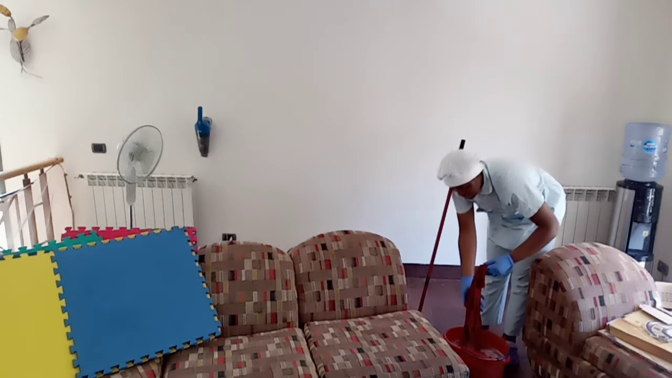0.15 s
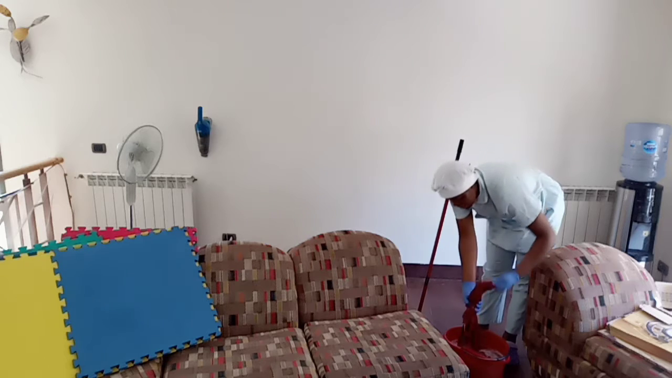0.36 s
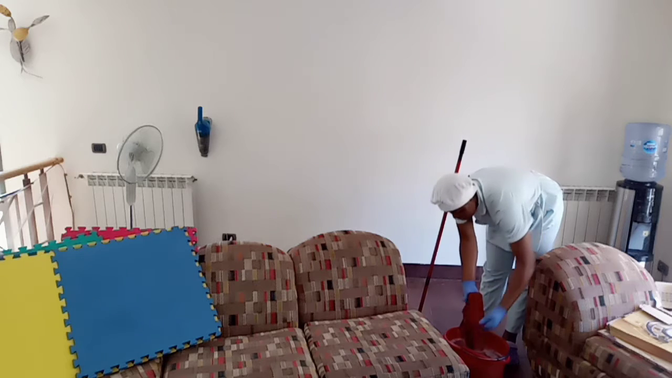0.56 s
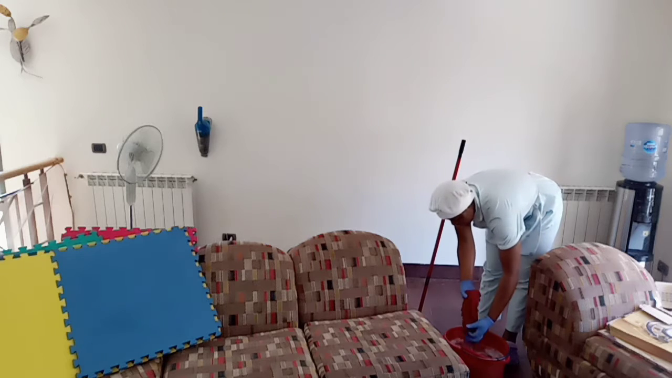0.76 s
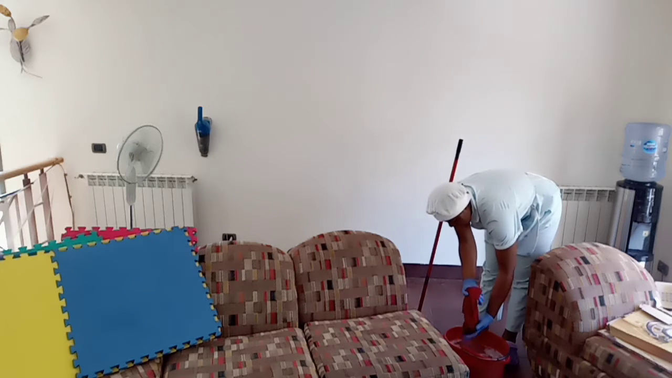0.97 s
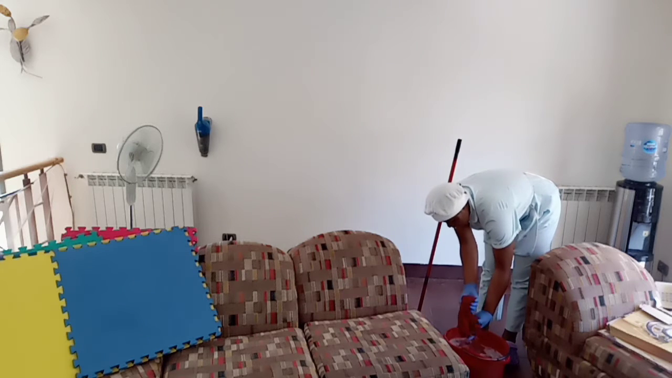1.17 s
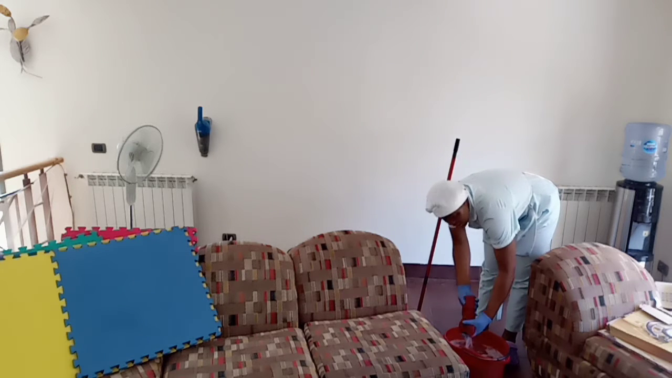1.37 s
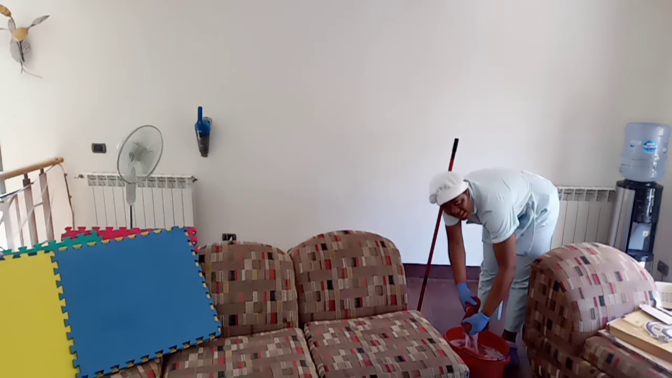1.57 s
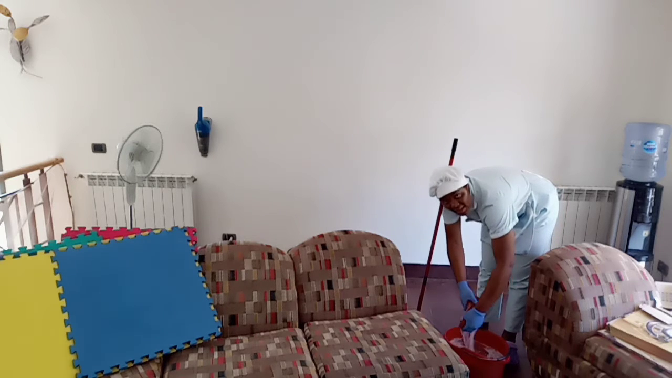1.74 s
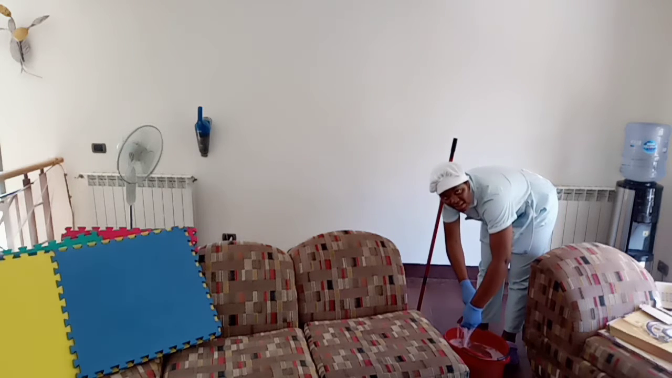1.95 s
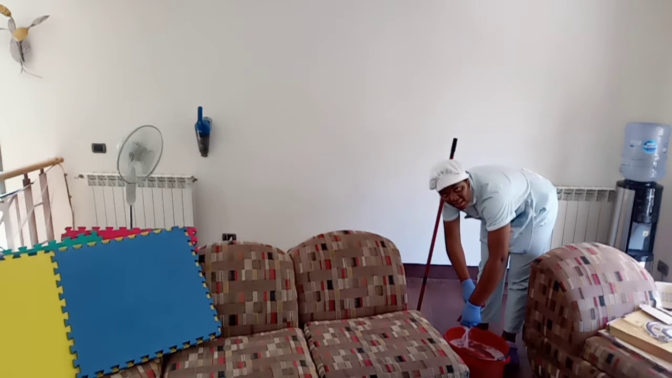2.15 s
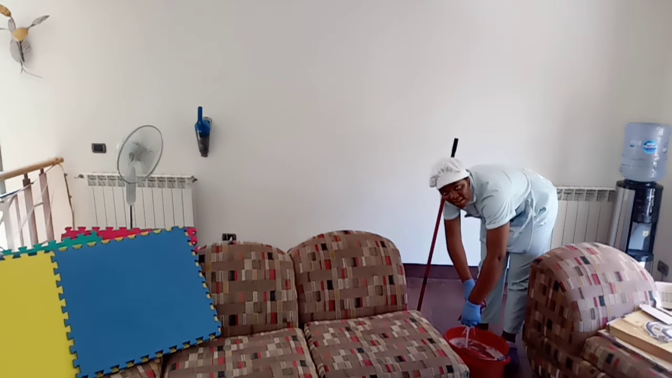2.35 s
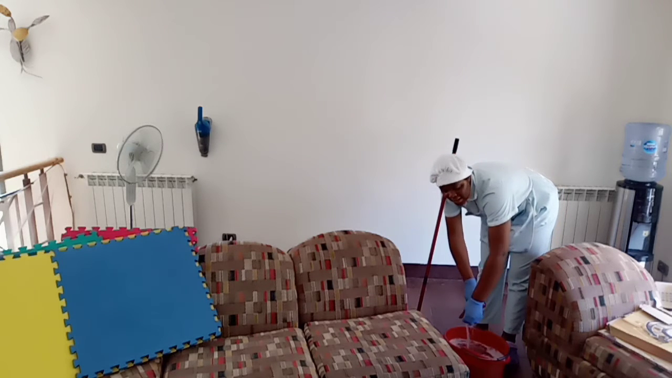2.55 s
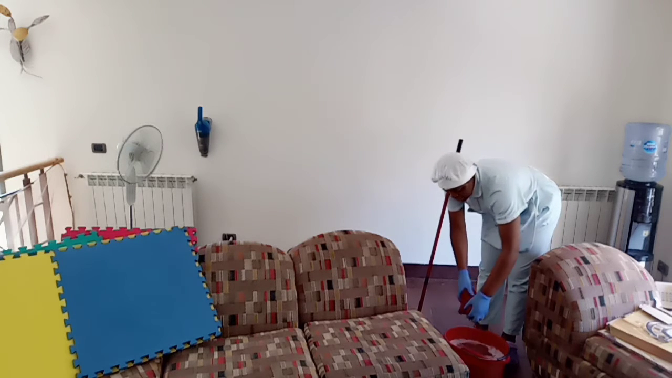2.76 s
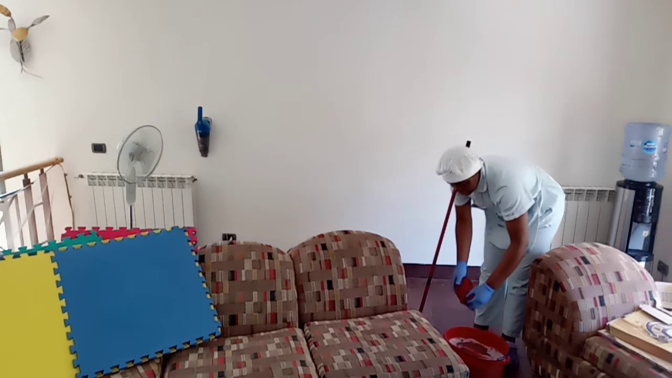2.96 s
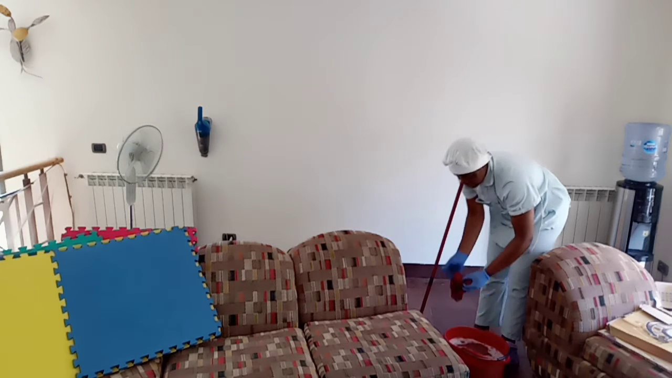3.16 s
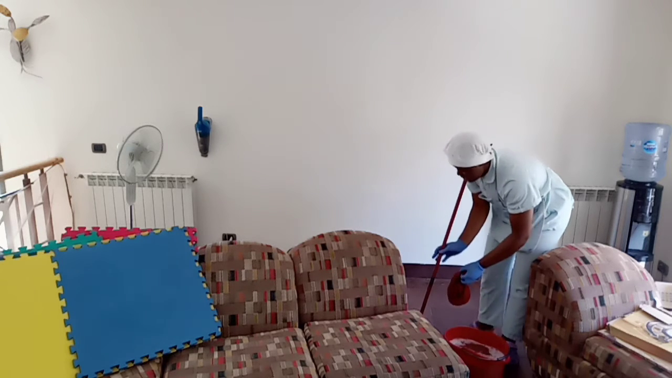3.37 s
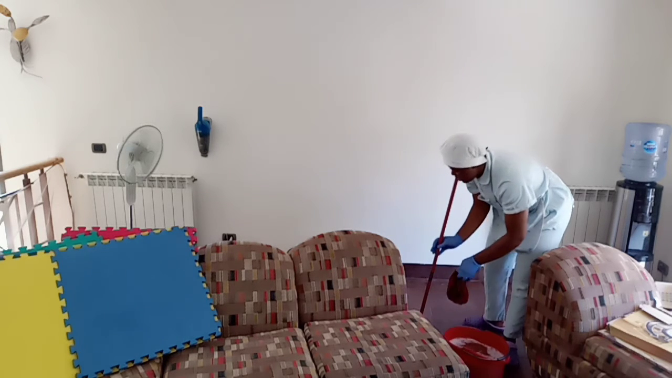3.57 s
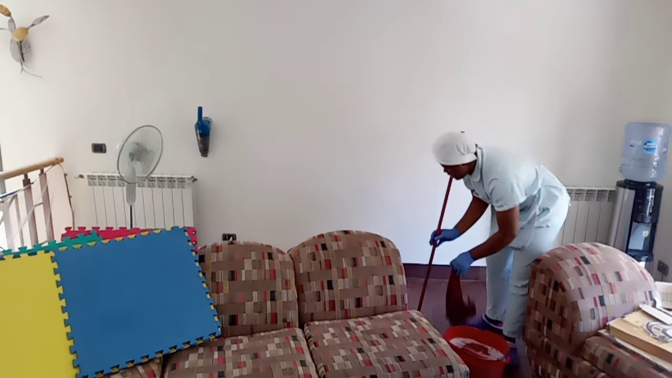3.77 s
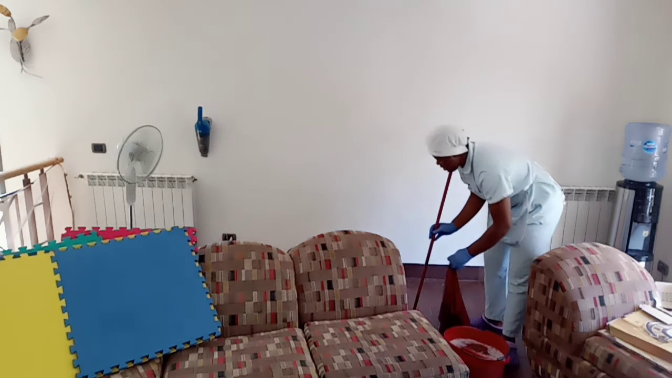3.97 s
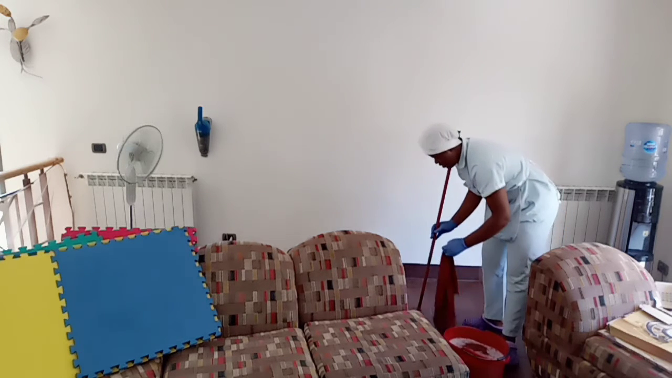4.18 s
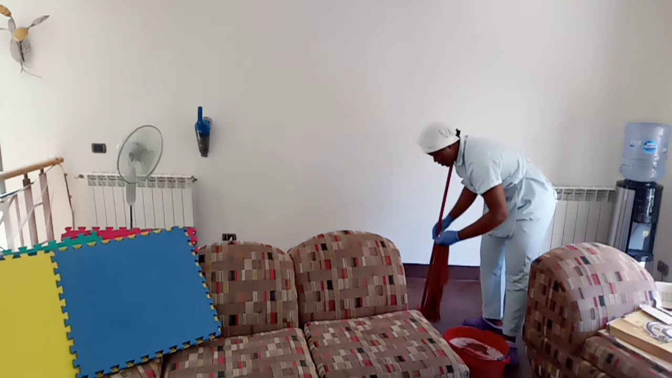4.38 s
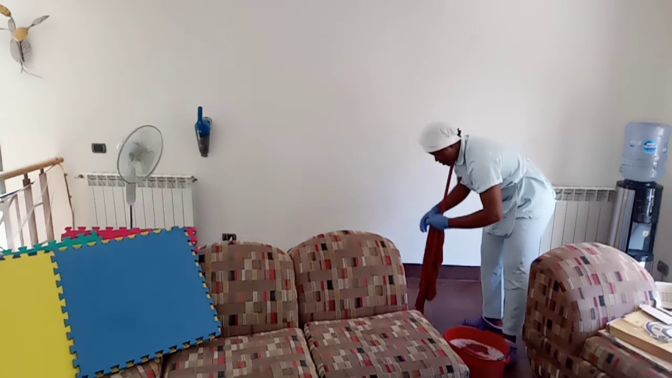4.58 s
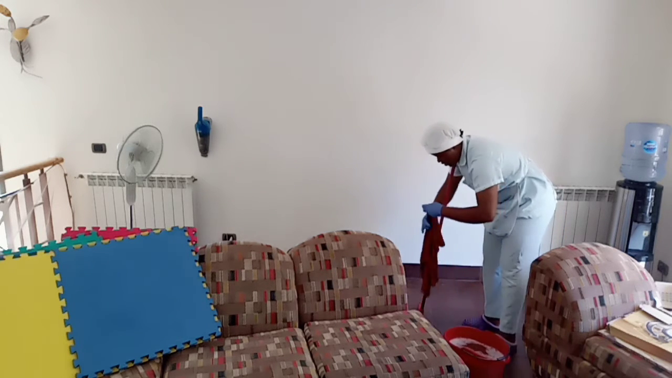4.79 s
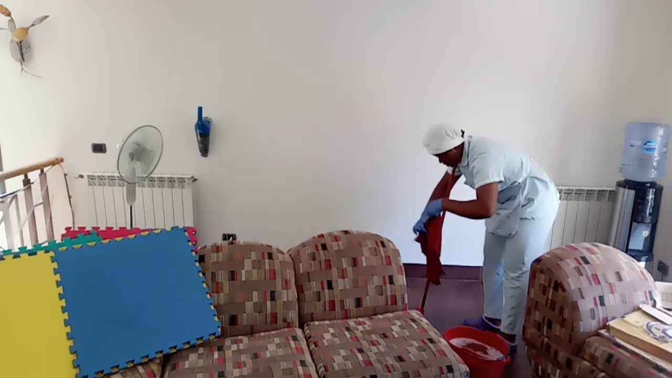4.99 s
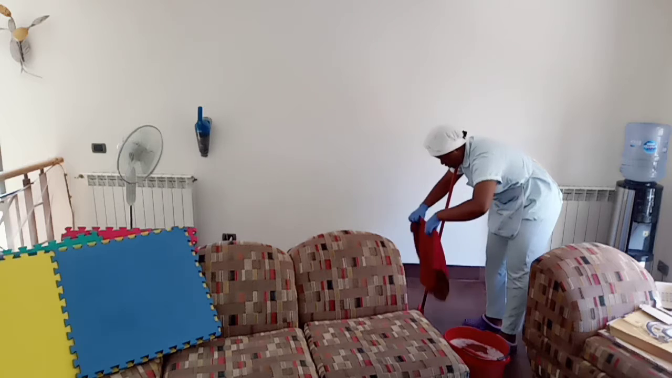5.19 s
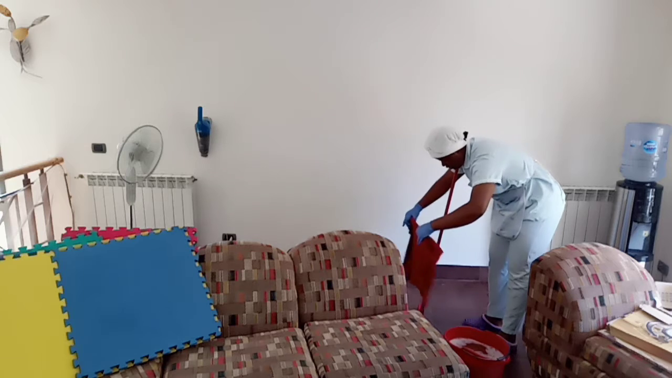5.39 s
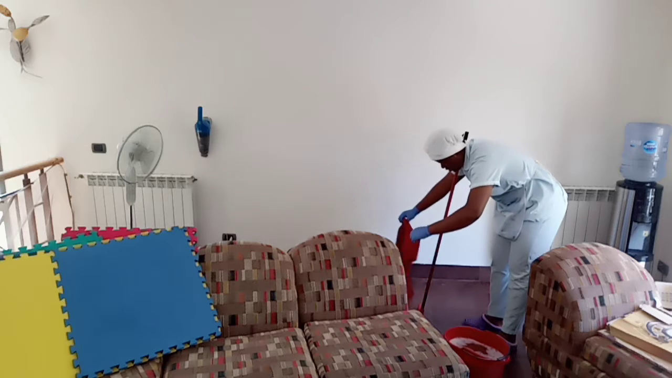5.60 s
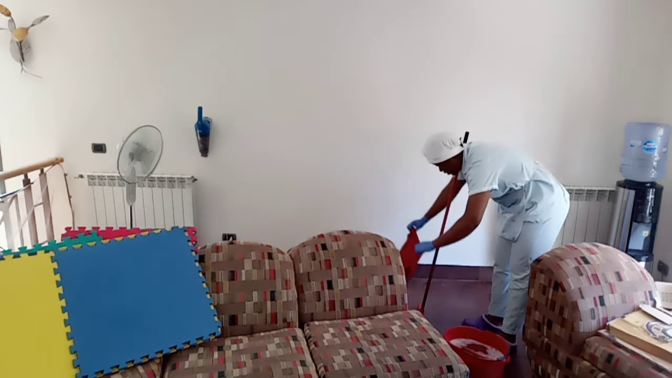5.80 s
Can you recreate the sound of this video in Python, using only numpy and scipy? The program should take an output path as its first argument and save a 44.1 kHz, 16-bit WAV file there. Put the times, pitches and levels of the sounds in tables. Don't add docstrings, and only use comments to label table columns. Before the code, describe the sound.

A wet rag is squeezed over a bucket with trickling, ringing splashes, then shaken out with a slap before a handle knocks something hollow.

```python
import sys
import numpy as np
from scipy import signal
from scipy.io import wavfile
from scipy.ndimage import uniform_filter1d

SR = 44100
rng = np.random.default_rng(int(sys.argv[2]) if len(sys.argv) > 2 else 0)


def amplitude_ratio(level_db):
    exponent = np.asarray(level_db, float) / 20
    return 10 ** exponent


def int16_out(signal):
    q = np.round(np.clip(np.atleast_2d(signal).T, -1, 1) * 32767)
    wavfile.write(sys.argv[1], SR, q.astype(np.int16))


N = 257279

# t/s, flow/dB
FLOW = [(0.0, -60), (0.16, -78.5), (0.41, -53.5), (0.63, -64), (0.75, -52), (0.97, -55), (1.1, -64.5),
        (1.23, -57), (1.3, -57), (1.35, -56), (1.74, -39), (2.3, -40), (2.44, -47.5), (2.47, -50.5),
        (2.68, -55), (2.88, -50), (2.96, -64), (3.15, -82.5)]
# f/Hz, density/dB per Hz
STREAM_SPECTRUM = [(680, -24), (1150, -6), (1620, -11), (2040, 1), (2960, -0.5), (3310, 0.5), (3700, -9),
                   (4780, -15), (6000, -46), (7800, -52), (13200, -120)]
# f/Hz, density/dB per Hz
SPRAY_SPECTRUM = [(2650, -44.5), (4500, -23), (5740, 9), (6920, -5), (7720, 11.5), (8600, 0), (9450, 3.5),
                  (12600, -11), (15500, -14)]
# f/Hz, width/Hz, level/dB
BUCKET_MODES = [(319, 75, -10), (502.8, 114, 8.5), (646, 38, -8), (850, 140, 6.5), (991, 64, -3.5)]
# t/s, peak/dB, f/Hz, ring/cycles
CLEAR_BUBBLES = [(0.1294, -47.5, 2540, 19), (0.338, -46, 3220, 11), (.345, -44, 2750, 9.2), (.366, -43.5, 3270, 19),
                 (0.411, -41, 2290, 9), (0.417, -48, 3670, 15), (0.498, -36.5, 2280, 9), (0.6793, -45.5, 1500, 4.7),
                 (0.712, -47, 4550, 15), (0.7236, -49.5, 1280, 7.1), (0.732, -37, 3570, 9), (.752, -37, 4130, 5.7),
                 (0.885, -41, 3160, 16), (0.8945, -41.5, 1620, 4.2), (.905, -47, 3630, 8), (.917, -41, 3900, 7),
                 (0.956, -48, 3200, 10), (0.381, -53, 3000, 9.3), (.44, -59, 3360, 10), (.66, -46, 3260, 9),
                 (.77, -40, 3600, 8), (.81, -47, 3360, 8.7), (1.041, -45.5, 2570, 9), (1.225, -43, 3630, 7),
                 (0.969, -32.5, 2200, 8), (1.001, -65, 3680, 6), (1.1144, -52, 3610, 18), (1.157, -43, 3140, 6.8),
                 (1.208, -36.5, 3810, 3.2), (1.24, -40.5, 3350, 12), (2.7674, -38.5, 3150, 11),
                 (2.7963, -35.5, 3960, 9.1), (2.82, -40, 4100, 8.2), (2.879, -48, 2920, 4.5), (2.921, -45, 4030, 4),
                 (2.8613, -31, 2480, 4.4), (2.8995, -28.5, 3550, 6), (3.01, -50, 2356, 18),
                 (3.0128, -45.5, 1505, 3.2), (3.387, -47.5, 1400, 5.8), (3.421, -56, 1250, 6.4),
                 (2.862, -38, 3460, 6), (.39, -49, 3500, 8), (.419, -41, 2370, 7), (.471, -46, 3300, 8),
                 (0.504, -48, 2430, 7), (.506, -48, 3200, 7), (.894, -42.5, 3200, 4), (.976, -42, 2100, 8),
                 (0.909, -51, 1410, 7),
                 (1.3353, -38.5, 2600, 7.4), (1.4244, -34, 2570, 8.4), (1.4744, -36, 2360, 1.8),
         (1.507, -30, 3110, 19), (1.5303, -49, 2850, 10), (1.5808, -35, 1786, 3.7),
         (1.6013, -31, 3150, 7.8), (1.6706, -31, 3170, 21), (1.697, -32, 2550, 25),
         (1.7303, -27.5, 2570, 3.5), (1.7865, -16, 3395, 6.6), (1.898, -32.5, 2400, 12),
         (1.9245, -36.5, 2000, 7.2), (1.9869, -25, 3150, 3.8), (2.0389, -43, 2620, 6.3),
         (2.0797, -27.5, 3650, 11.5), (2.116, -26.5, 3410, 7.5), (2.1905, -26, 3050, 8.9),
         (2.363, -28, 4570, 8.5), (2.379, -31, 3310, 15), (2.383, -34.5, 1970, 15), (2.448, -30.5, 1970, 4),
         (2.4528, -25.5, 2290, 3.2), (2.462, -32, 3640, 6), (2.456, -27, 3050, 3.6),
         (2.47, -36.5, 2040, 25), (2.51, -38, 2075, 14), (2.5006, -27, 3660, 5.5), (2.569, -34.5, 3980, 9),
         (2.608, -38, 3120, 13)]
# t/s, peak/dB, f/Hz
GLUGS = [(0.379, -61, 1070), (0.502, -54, 940), (1.311, -54, 528), (1.335, -55, 830), (1.35, -47, 507),
         (1.42, -62, 804), (1.879, -43.5, 492), (1.75, -43.5, 626), (1.717, -45, 614), (1.786, -37.5, 522),
         (1.83, -43, 570), (1.97, -35, 948), (1.975, -27, 840), (2.148, -47, 1075), (2.179, -43.5, 1060),
         (2.635, -50.5, 804), (2.809, -48, 952), (2.9, -64, 493), (2.03, -44, 860), (2.073, -39.5, 476),
         (2.131, -39, 1039), (2.213, -46, 549), (2.33, -48, 624), (2.381, -45, 827), (2.473, -66, 965),
         (2.641, -42, 520), (2.679, -54, 576), (2.74, -52, 474), (2.782, -49, 472), (2.819, -37, 821),
         (2.822, -40, 482), (2.861, -47, 933), (2.869, -55, 460), (2.803, -47, 480), (2.845, -50, 453),
         (2.883, -62, 474), (2.655, -48.5, 543), (2.76, -57, 485), (1.328, -49, 527), (1.5, -49.5, 517),
         (1.535, -54, 500), (2.595, -55, 855), (2.585, -52, 504), (2.848, -68, 870), (2.875, -55, 785),
         (2.25, -49, 553), (2.29, -47, 583), (2.42, -47.5, 487), (1.689, -48, 1320)]
# t/s, peak/dB, f/Hz
WALL_THUMPS = [(0.028, -61.5, 192), (1.594, -55, 275), (1.952, -52, 325), (2.084, -49, 305),
               (2.117, -43.5, 287), (2.167, -50, 280), (2.218, -47, 275), (2.299, -57, 266),
               (2.37, -53, 292), (2.429, -52.5, 258), (2.49, -63, 275), (2.68, -62, 343), (2.57, -56, 301),
               (2.19, -48, 293), (2.53, -58, 269), (2.6, -60, 299), (2.645, -58, 324), (1.635, -58, 303),
               (1.99, -52, 320)]
# t/s, peak/dB, f/Hz, ring/cycles
POPS = [
    (1.482, -44, 1240, 5),
    (1.49, -40, 975, 5.3),
    (2.1159, -26, 970, 3.3),
    (2.121, -31.5, 903, 3.9),
    (2.155, -49, 1110, 3.3),
    (2.48, -43, 1240, 5),
    (2.861, -41.5, 930, 6),
]
# t/s, peak/dB, f/Hz, spatter re ring/dB
DROPLETS = [(0.2275, -57, 9500, 0), (0.3541, -56, 6840, 2.5), (0.391, -52, 9560, 0),
            (0.4125, -47, 8640, -3), (0.4697, -48.5, 9700, 2), (0.5701, -53, 9740, -6),
            (0.6537, -51.5, 8600, -4), (0.712, -48, 5050, -1), (0.7517, -51.5, 8750, 4),
            (0.7802, -49.5, 9300, 2), (0.8857, -53.5, 9000, 7), (0.9144, -54, 9300, 6.5),
            (0.957, -40.5, 10900, -10), (1.0156, -47, 9730, -13), (1.12, -55, 5200, -5),
            (1.159, -45.5, 8370, -6), (1.209, -45.5, 5220, 1.5), (1.3496, -61, 5140, -6),
            (1.384, -58, 9600, -3), (1.4788, -48, 8610, 1), (1.4867, -39, 10500, -3),
            (1.496, -46, 11300, -9), (1.5826, -54, 9600, -10), (1.623, -41.5, 6600, -2),
            (1.6922, -38, 9250, -2), (1.705, -40, 10200, -3), (1.7444, -43, 8900, 3),
            (1.7956, -37, 6340, -9), (1.848, -37.5, 9750, -1), (1.8734, -43, 7100, -5),
            (1.933, -39.5, 7350, 6.5), (1.9894, -41, 5000, 4), (2.0461, -38, 10200, -3),
            (2.077, -39, 8540, 5), (2.117, -34, 8650, 1.5), (2.197, -31.5, 9360, -1),
            (2.2212, -29, 9500, -4), (2.502, -46, 7400, 8), (2.258, -36, 5100, 0), (2.348, -34.5, 5300, 0),
            (2.439, -42, 9900, 2), (2.5619, -44, 9750, 4), (2.6781, -39, 9440, -4), (2.734, -46, 9200, -3),
            (2.8658, -51, 8800, 5), (2.8787, -42.5, 4870, -1), (2.5325, -44, 9900, -4),
            (3.0113, -51, 5240, -4), (3.0702, -59, 7170, 6), (3.545, -48, 9440, -6)]
# f/Hz, density/dB per Hz
SPATTER_SPECTRUM = [(3000, -39), (5000, 3.5), (7000, 0.5), (9300, 0.5), (11500, -1.5), (15500, -10)]
# t/s, level/dB, length/s
SPLASHES = [(.712, -57, 0.018), (2.475, -52, 0.012), (2.765, -60, 0.018), (1.206, -65, .02),
            (1.326, -45.5, 0.059), (1.365, -70, 0.032), (1.42, -50, 0.032), (1.472, -43, 0.03),
            (2.115, -35, 0.017), (2.19, -29, 0.0088), (2.378, -50, .012), (2.448, -44, 0.013),
            (2.5, -57, 0.0089), (2.86, -53, 0.0062), (.336, -55, 0.021), (.41, -59, 0.018),
            (.885, -51.5, 0.032), (1.114, -57.5, 0.018), (1.55, -40.5, 0.019), (1.665, -47, 0.014),
            (1.98, -36, 0.027), (2.03, -45, 0.011), (2.085, -49, 0.0077), (2.56, -53, 0.015),
            (2.9, -47, .01), (3.01, -59, 0.009)]
# f/Hz, density/dB per Hz
SPLASH_SPECTRUM = [(400, -21), (800, 2), (1400, 0.5), (2300, 9), (3800, 0), (4400, -7), (5400, -11),
                   (9000, -38), (15500, -24)]
# t/s, peak/dB, length/s
SLAPS = [
    (3.36, -48, 0.0086),
    (3.39, -43, 0.016),
    (3.405, -42, 0.011),
    (3.955, -30, 0.022),
    (3.958, -36, 0.011),
    (3.963, -20.5, 0.0074),
    (3.972, -20.5, 0.0074),
    (3.98, -24.5, 0.016),
]
# f/Hz, density/dB per Hz
SLAP_SPECTRUM = [(50, -37), (100, -9.5), (170, -9.5), (640, -5.5), (1100, -15), (1450, -10.5), (2360, -1.5),
                 (2810, -3.5), (3770, -5), (5340, -19.5), (9380, -16.5), (15500, -33)]
# t/s, peak/dB, length/s
KNOCKS = [
    (4.282, -41, 0.0043),
    (4.283, -26.5, 0.018),
    (4.287, -19, 0.0076),
    (4.292, -14.5, 0.0065),
    (4.304, -21.5, 0.006),
]
# f/Hz, density/dB per Hz
CRACK_SPECTRUM = [(180, -14), (300, 0), (652, -6.5), (782, -8), (892, -4), (1110, -13), (2330, -4),
                  (3750, -9.5), (4810, -19.5), (9470, -30.5), (15500, -69)]
# f/Hz, level/dB, t60/s
HOLLOW_MODES = [(97.4, 1.5, 0.26), (118, -9, 0.91), (132, 2.5, 0.57), (168, -9, 0.45), (200.6, 1.5, 0.5),
                (205.9, -2, 0.61), (229, -1, 0.23), (261, -0.5, 0.41), (331, -11, 0.28), (381, -14, 0.31),
                (474, -21, 0.62), (576, -20, 0.62), (664, -13, 0.65), (870, -13, 0.16)]
# centre t/s, treble/dB, half length/s, body re treble/dB
RUSTLES = [(.05, -75.5, 0.29, 2.5), (1.515, -61.5, 0.034, 12.5), (2.477, -55, 0.013, 6),
           (0.262, -62.5, 0.034, -8), (0.598, -66, .04, -20), (1.217, -62.5, 0.013, 8.5),
           (2.11, -52.5, 0.46, 3), (2.69, -57.5, 0.25, -8), (3.084, -66, 0.017, -25),
           (3.011, -55.5, 0.0025, 2), (3.22, -72.5, 0.14, 5), (3.393, -64, 0.067, 0.5),
           (3.547, -65, 0.056, -5), (3.646, -63, 0.048, -0.5), (3.764, -72, 0.038, -26),
           (4.421, -66, 0.1, 11), (4.702, -65.5, 0.064, 3), (4.96, -61.5, 0.09, -0.5),
           (5.274, -65, 0.11, -2), (5.494, -69.5, 0.067, -1.5), (5.638, -66.5, 0.045, -8)]
# f/Hz, density/dB per Hz
CLOTH_SPECTRUM = [(300, -13.5), (500, -3), (900, -2), (1400, -7), (2100, 2.5), (3000, 5), (4200, -1),
                  (5200, -9.5), (7500, -10.5), (9400, -7), (11500, -14.5), (15500, -21)]
# centre t/s, level/dB, half length/s
FLOOR_MOVES = [
    (0.01, -70.5, 0.084),
    (.85, -78, 1),
    (2.0, -68.5, 0.92),
    (3.0, -80, 0.35),
    (4.4, -48, 0.094),
    (4.55, -59, 0.066),
    (4.7, -69, 0.027),
    (4.95, -72, 0.021),
    (5.1, -75.5, 0.53),
    (5.35, -69, 0.031),
]
# f/Hz, density/dB per Hz
RUMBLE_SPECTRUM = [(15, -28), (25, -35), (92, 4), (215, -7.5), (249, 0), (276, -9), (300, -0.5),
                   (390, -8.5), (660, -120)]
# f/Hz, density/dB per Hz
HUSH_SPECTRUM = [(90, -10), (150, -3), (300, -12.5), (650, -9.5), (1300, -17.5), (2100, -14.5),
                 (3200, -12.5), (4200, -20), (5400, -33), (7500, -31), (9500, -27.5), (15500, -52)]
# f/Hz, t60/s
ROOM_T60 = [(100, 0.98), (300, 0.42), (1000, 0.64), (3000, 0.51), (6000, 0.44), (12000, 0.48)]
# t/s, level/dB
ECHOES = [(.0045, -12), (.009, -7.5), (0.0135, -11), (0.023, -31), (.029, -9.5)]
# f/Hz, gain/dB
MIC_RESPONSE = [(3000, 0), (4200, 2.5), (4800, -1), (6000, -1), (8200, 0), (9300, 2.5), (10500, -0.5)]


def water():
    inside, flow_db = flow()
    full_flow_db = -40
    bubbles = swarm(STREAM_SPECTRUM, 780, 5650, cycles=9, per_s=45, spread_db=3.8)
    spray = swarm(SPRAY_SPECTRUM, 4980, 13400, cycles=5, per_s=160, spread_db=3)
    boom = bucket_boom()
    lumps_db = clumps()
    under_db = flow_db - full_flow_db + 0.45 * lumps_db
    full = inside * amplitude_ratio(full_flow_db)
    body = amplitude_ratio(under_db - 5.5) * bubbles + amplitude_ratio(-14 + 1.36 * under_db) * boom
    spray_gain = amplitude_ratio(-18.5 + 0.98 * under_db + 0.3 * lumps_db)
    return room(full * body, wet_db=-1) + room(full * spray_gain * spray, wet_db=-4)


def flow():
    s, db = np.transpose(FLOW)
    t = np.arange(N) / SR
    gate = ((t >= s[0]) & (t <= s[-1])) * 1.0
    return uniform_filter1d(gate, 2000, mode="nearest"), np.interp(t, s, db)


def swarm(spectrum, low_hz, high_hz, cycles, per_s, spread_db):
    flurry_db, flurries_per_s = 2.8, 25
    flurry_steps = np.arange(N) / SR * flurries_per_s
    out = np.zeros(N)
    for hz in np.geomspace(low_hz, high_hz, num=26):
        wobble_db = flurry_db * np.interp(flurry_steps, np.arange(200), rng.standard_normal(200))
        bursting = amplitude_ratio(wobble_db) * grains(per_s, spread_db)
        ring = bubble(hz, cycles, rise=0.216, onset=2.1)
        out += amplitude_ratio(read(spectrum, hz)) * hz * signal.oaconvolve(bursting, ring)[:N]
    return evened(out)


def bucket_boom():
    t = np.arange(4000) / SR
    boom = np.zeros(N)
    for hz, width_hz, db in BUCKET_MODES:
        envelope = (1 - np.exp(-t / 0.011)) * np.exp(-np.pi * width_hz * t)
        ring = amplitude_ratio(db) * envelope * np.sin(2 * np.pi * hz * t)
        boom += signal.oaconvolve(grains(110, 0.81), ring)[:N]
    return evened(boom)


def clumps():
    per_s, fall_s, depth_db = 42, 0.0072, 2.5
    t = np.arange(6000) / SR
    lump = (1 - np.exp(-t / 0.009)) * np.exp(-t / fall_s)
    lumps = signal.oaconvolve(abs(grains(per_s, 1)), lump)[:N]
    return depth_db * np.clip(evened(lumps - lumps.mean()), -2, 3)


def drips():
    twins = rng.random((2, 80, 4))
    small = clear_bubbles(twins[0]) + bursts(SPLASHES, SPLASH_SPECTRUM)
    return (room(small, wet_db=-3, echo_db=-4)
            + room(air_pockets(twins[1]), wet_db=-8, echo_db=-5.5)
            + room(droplets(), wet_db=-6, echo_db=-2))


def clear_bubbles(twins):
    out = np.zeros(N)
    drip_rise, chirp_rise, onset = 0.07, 0.22, 1.5
    for (s, db, hz, cycles), (late, size, later, other) in zip(CLEAR_BUBBLES, twins):
        rise = chirp_rise if cycles < 5 else drip_rise
        cycles = max(cycles, 6)
        near_hz = hz * (1 + 0.1 * (size - 0.5))
        far_hz = hz * (1 + 0.318 * (other - 0.5))
        add(out, s - 0.003, amplitude_ratio(db - 5) * bubble(hz * (1 - rise / 2), cycles, rise, onset))
        add(out, s + 0.0098 * late, amplitude_ratio(db - 10) * bubble(near_hz, cycles, drip_rise, onset))
        add(out, s + 0.027 * later, amplitude_ratio(db - 16) * bubble(far_hz, cycles, drip_rise, onset))
    return out


def air_pockets(twins):
    out = np.zeros(N)
    ring_s, twin_cycles, rise, onset = 0.012, 7.5, 0.02, 0.8
    for (s, db, hz), (late, size, _, _) in zip(GLUGS + WALL_THUMPS, twins):
        cycles = max(hz * ring_s, twin_cycles - 2)
        twin_hz = hz * (0.925 + 0.191 * size)
        add(out, s - 0.006, amplitude_ratio(db) * bubble(hz, cycles, rise, onset))
        add(out, s + 0.02 + 0.028 * late, amplitude_ratio(db - 19) * bubble(twin_hz, twin_cycles, rise, onset))
    for s, db, hz, cycles in POPS:
        add(out, s - 0.001, amplitude_ratio(db) * bubble(hz, cycles, rise=0.05, onset=3.6))
    return out


def droplets():
    out = np.zeros(N)
    for s, db, hz, _ in DROPLETS:
        add(out, s - 0.001, amplitude_ratio(db - 4.5) * bubble(hz, cycles=9, rise=0.0044, onset=0.9))
    spatter_s = 0.0046
    spatter = [(s, db + wide_db + 4.5, spatter_s) for s, db, _, wide_db in DROPLETS]
    return out + bursts(spatter, SPATTER_SPECTRUM)


def bubble(hz, cycles, rise, onset):
    u = np.arange(round(4 * SR * cycles / hz)) / SR * hz / cycles
    shape = (1 - np.exp(-u * onset)) ** 2 * np.exp(-2.2 * u)
    return shape / shape.max() * np.sin(2 * np.pi * cycles * (u + rise * u ** 2 / 2))


def bursts(rows, spectrum):
    swell_s = 0.005
    level, t = np.zeros(N), np.arange(8000) / SR
    for s, db, length_s in rows:
        add(level, s - 0.004, amplitude_ratio(db) * (1 - np.exp(-t / swell_s)) ** 2 * np.exp(-t / length_s))
    return level * evened(coloured(rng.standard_normal(N), spectrum))


def slap():
    return contacts(SLAPS, SLAP_SPECTRUM, wet_db=0.095, dull_hz=9400)


def knock():
    out = contacts(KNOCKS, CRACK_SPECTRUM, wet_db=1, dull_hz=7000)
    t = np.arange(SR) / SR
    add(out, KNOCKS[3][0] - 0.002, amplitude_ratio(-16) * bubble(2300, cycles=8, rise=0.03, onset=6))
    hollow_db = -31.5
    for hz, db, t60_s in HOLLOW_MODES:
        ring = amplitude_ratio(hollow_db + db - 60 * t / t60_s) * np.sin(2 * np.pi * hz * t)
        add(out, KNOCKS[2][0], ring * (1 - np.exp(-t * hz * 0.44)))
    return out


def contacts(rows, spectrum, wet_db, dull_hz):
    out = np.zeros(N)
    dull = signal.butter(1, dull_hz, fs=SR)
    for s, db, length_s in rows:
        u = np.arange(4000) / SR / length_s
        puff = amplitude_ratio(db) * np.sqrt(u) * np.exp(-u * 2) * rng.standard_normal(4000)
        add(out, s, puff)
        add(out, s, np.linalg.norm(puff) * signal.lfilter(*dull, tail(wet_db)))
    return coloured(out, spectrum)


def rustle():
    fibres = evened(coloured(grains(4000, 1.6), CLOTH_SPECTRUM))
    body = signal.sosfiltfilt(signal.butter(4, 4800, fs=SR, output="sos"), fibres)
    treble_level = swells((s, db, half_s) for s, db, half_s, _ in RUSTLES)
    body_level = swells((s, db + body_db, half_s) for s, db, half_s, body_db in RUSTLES)
    return amplitude_ratio(-1.5) * (treble_level * (fibres - body) + body_level * body)


def swells(rows):
    t = np.arange(N) / SR
    return sum(amplitude_ratio(db) * np.exp(-((t - s) / half_s) ** 2) for s, db, half_s in rows)


def rumble():
    rest_db = -78.5
    return (amplitude_ratio(rest_db) + swells(FLOOR_MOVES)) * evened(coloured(rng.standard_normal(N), RUMBLE_SPECTRUM))


def hush():
    frames, hz = N // 256 + 5, np.fft.rfftfreq(1024, 1 / SR)
    real, imag, patches = rng.standard_normal((frames, 513, 3)).T
    patches = evened(uniform_filter1d(uniform_filter1d(patches, 14, 0), 16, 1))
    z = (real + 1j * imag) * amplitude_ratio(read(HUSH_SPECTRUM, hz)[:, None] + 1.3 * patches)
    return amplitude_ratio(-67) * evened(signal.istft(z, nperseg=1024, noverlap=768)[1][:N])


def room(x, wet_db, echo_db=0):
    shifts_per_s = 9
    path = np.zeros(2000)
    for k, (s, db) in enumerate([(0.0023, 0.024)] + ECHOES):
        path[round(s * SR)] += (-1) ** k * amplitude_ratio(db + echo_db * (k > 0))
    out = signal.oaconvolve(x, path)[:N]
    turn = np.pi * shifts_per_s * np.arange(N) / SR
    for k in range(3):
        share = np.sqrt(2 / 3) * np.cos(turn + np.pi * k / 3)
        out = out + signal.fftconvolve(x * share, tail(wet_db))[:N]
    return out


def tail(wet_db):
    patch_db, bend_per_s = 2.5, 0.23
    taps = np.zeros(SR)
    at = np.arange(200, SR - 20, 20) + rng.integers(0, 20, (SR - 201) // 20)
    taps[at] = rng.choice([-1., 1.], at.shape) * (1 - np.exp(-at / SR / 0.00079))
    hz, t, z = signal.stft(taps, SR, nperseg=256)
    patches = evened(uniform_filter1d(uniform_filter1d(rng.standard_normal(z.shape), 3, 0), 6, 1))
    decay_db = 60 * t * (1 + bend_per_s * t) / read(ROOM_T60, hz)[:, None]
    out = signal.istft(z * amplitude_ratio(patch_db * patches - decay_db), SR, nperseg=256)[1]
    return out * amplitude_ratio(wet_db) / np.linalg.norm(out)


def grains(per_s, spread_db):
    at, sign, size = rng.random((30000, 3))[:int(per_s * N / SR)].T
    out = np.zeros(N)
    size_db = spread_db * np.minimum(-np.log(size + 1e-9), 3)
    out[(at * N).astype(int)] = np.sign(sign - 0.5) * amplitude_ratio(size_db)
    return out


def coloured(x, spectrum):
    hz = abs(np.fft.fftfreq(8192, 1 / SR))
    log_gain = np.log(amplitude_ratio(np.maximum(read(spectrum, hz), -100)))
    taps = np.fft.ifft(np.exp(np.conj(signal.hilbert(log_gain)))).real[:4096]
    return signal.oaconvolve(x, taps / np.linalg.norm(taps))[:len(x)]


def read(points, hz):
    f, value = np.transpose(points)
    return np.interp(np.log(hz + 1), np.log(f + 1), value)


def evened(x):
    return x / np.sqrt(np.mean(x ** 2) + 1e-20)


def add(mix, s, sound):
    part = mix[round(s * SR):][:len(sound)]
    part += sound[:len(part)]


def scene():
    hands = room(rustle(), wet_db=2.1) + slap() + knock()
    return (water() + drips() + hands + rumble() + hush())[None]


def band_limit(x):
    return signal.sosfilt(signal.butter(12, 15690, fs=SR, output="sos"), x)


def record(dry):
    x = signal.sosfilt(signal.butter(2, 60, "high", fs=SR, output="sos"), dry)
    x = coloured(x[0], MIC_RESPONSE)[None]
    low_pass = signal.firwin(511, 15650, window=("kaiser", 9), fs=SR)
    mix = signal.oaconvolve(x, low_pass[None], "same")
    return band_limit(mix)


dry = scene()
out = record(dry)
int16_out(out)
```